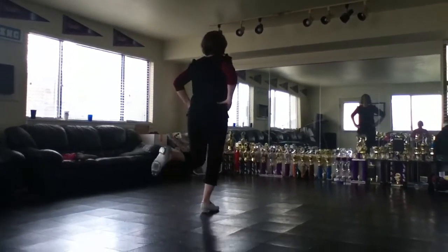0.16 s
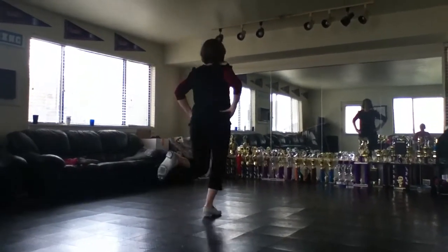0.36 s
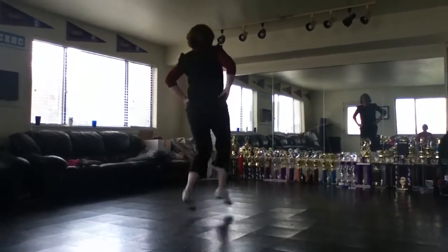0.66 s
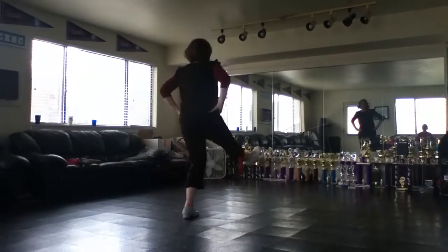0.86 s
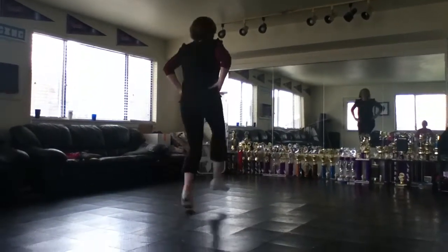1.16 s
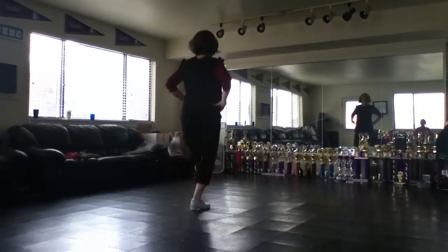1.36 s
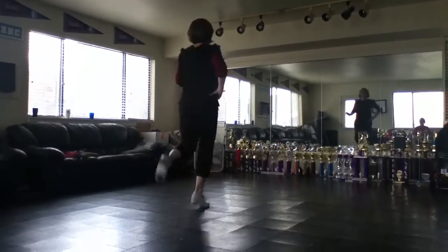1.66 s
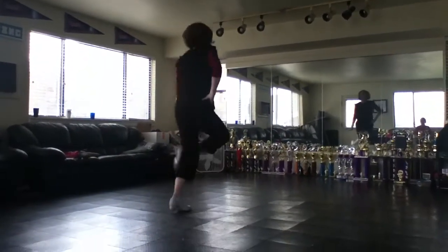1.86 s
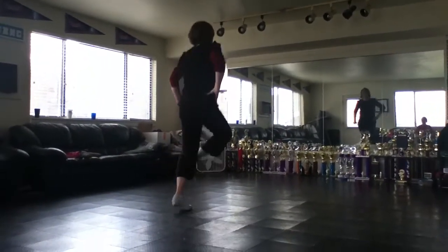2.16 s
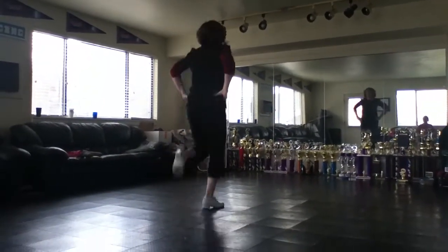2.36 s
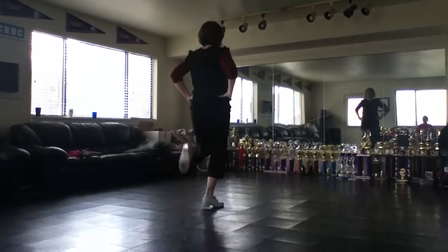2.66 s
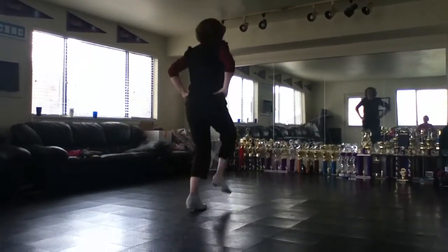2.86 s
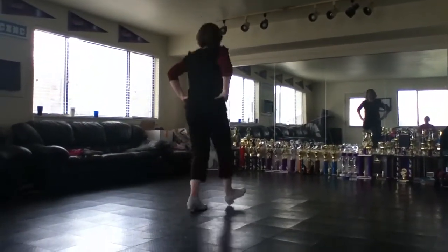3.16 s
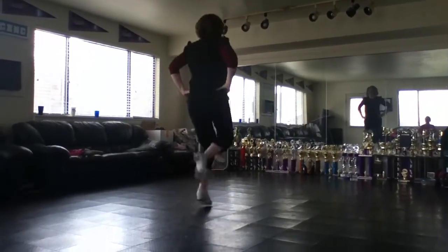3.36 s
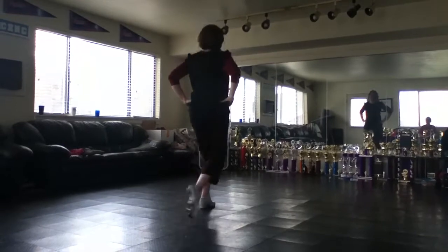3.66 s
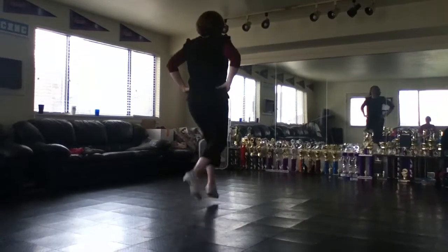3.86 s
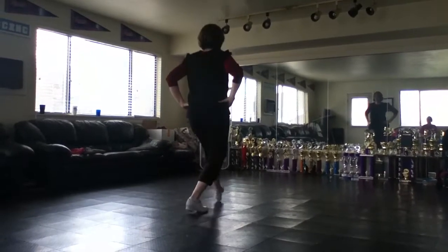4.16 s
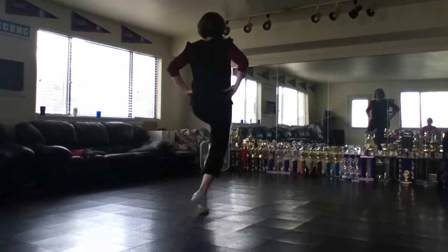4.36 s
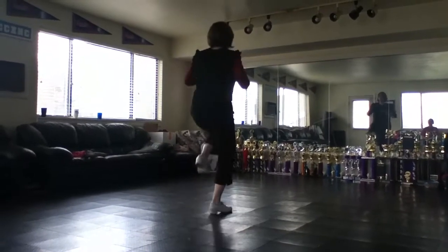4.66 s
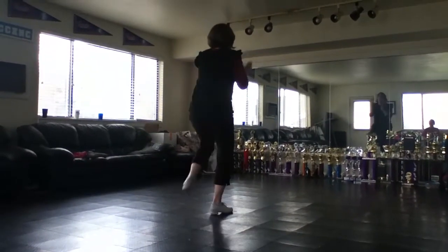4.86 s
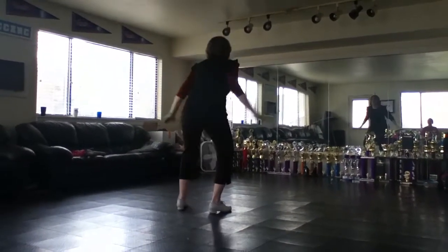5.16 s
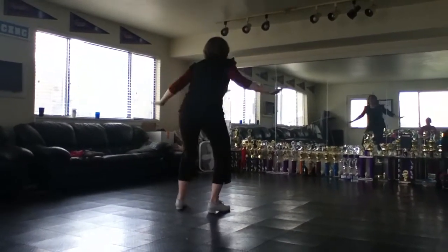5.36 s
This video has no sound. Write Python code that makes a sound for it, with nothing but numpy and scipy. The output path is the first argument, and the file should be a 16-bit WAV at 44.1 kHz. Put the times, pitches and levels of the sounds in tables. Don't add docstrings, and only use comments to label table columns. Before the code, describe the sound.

A lone dancer's steel-tapped shoes strike tile in sharp, thudding steps with metallic rattles between, ringing through a reverberant mirrored studio.

```python
import sys
import numpy as np
from scipy import signal
from scipy.fft import rfft, irfft
from scipy.io import wavfile

SR = 44100
rng = np.random.default_rng(int(sys.argv[2]) if len(sys.argv) > 2 else 0)


def dump(signal):
    limited = np.clip(np.atleast_2d(signal).T, -1, 1)
    pcm = np.round(limited * 32767).astype(np.int16)
    wavfile.write(sys.argv[1], SR, pcm)


def invert_db(x):
    u = np.asarray(x, float) / 20
    return 10 ** u


N = 243431
LEAD = 8192

# pitch in Hz, level in dB, time to fade by 60 dB in seconds.
FLOOR_MODES = [(171.4, -15, 0.077), (200.4, -9, 0.041), (254.4, -3, 0.034), (317, -10.5, 0.055)]
# pitch in Hz, level in dB, time to fade by 60 dB in seconds.
SOLE_MODES = [(561, -2, 0.05), (655.2, 0, 0.039), (740, 4, 0.051), (888, 2.5, 0.092), (983, 8.5, 0.033),
              (1052, 6.5, 0.039), (1290, 13, 0.034)]
# pitch in Hz, level in dB, time to fade by 60 dB in seconds.
TILE_MODES = [(1290, -5, 0.0025), (1890, 2, 0.0031), (2360, -1, 0.0027), (2850, -1.5, 0.0036),
              (3500, 3.5, 0.0029), (4500, 7.5, 0.0018)]
# pitch in Hz, level in dB, time to fade by 60 dB in seconds.
SLAB_MODES = [(38.3, -10, 0.6), (47.8, -17, 0.7), (69.1, -6.5, 0.6), (95.9, 1, 0.35)]
# pitch in Hz, level in dB, time to fade by 60 dB in seconds.
FIRST_PLATE = [(4020, -47, 0.058), (5020, -3.5, 0.04), (5150, -25, 0.03), (5830, 3, 0.04),
               (7440, -14.5, 0.018), (8100, -12.5, 0.019), (8310, -5.5, 0.085), (11000, -11.5, 0.09),
               (12700, -23, 0.073), (13300, -13, 0.038), (13800, -27, 0.018)]
# pitch in Hz, level in dB, time to fade by 60 dB in seconds.
SECOND_PLATE = [(4110, 3.5, 0.019), (4700, 2.5, 0.03), (5220, -1, 0.12), (6480, -3.5, .03),
                (7500, 0.5, 0.093), (9050, -1, 0.062), (10400, -26, 0.04), (11900, -8, .04),
                (13500, -34, .04), (14800, -19, .03)]

# start in seconds, steel crack in dB,
# heel thud in dB, sole knock in dB, pitch the sole favours in Hz.
STOMPS = [(-.09, -5.5, -13.5, -38, 544), (0.9686, -8, -16, -5.5, 1020), (1.515, -7, -22, -5.5, 698),
          (2.0674, -10, -18.5, -6, 830), (2.5834, -6, -14, -6.5, 740), (3.0972, -6.5, -14, -4, 573),
          (3.3775, -7.5, -15.5, -7.5, 816), (3.6582, -10.5, -19, -13.5, 930), (3.906, -5.5, -14, -4.5, 527),
          (4.1958, -5.5, -18, -8, 900), (4.7323, -8, -8, -38, 970), (5.2545, -3.5, -7, -10, 1210)]
# start in seconds, steel crack in dB, sole knock in dB.
BRUSHES = [
    (0.872, -30.5, -26.5),
    (1.411, -38, -45),
    (1.4342, -33.5, -50),
    (1.997, -32, -32),
    (2.4886, -38, -36),
    (3.047, -36, -40),
    (1.545, -26, -25),
    (5.288, -12.5, -14),
]
# start in seconds, steel crack in dB, heel thud in dB.
DRAG = [(4.643, -44, -39), (4.6631, -41, -40), (4.6937, -28.5, -39), (4.7123, -36, -24.5)]
BRUSH_THUD_DB, DRAG_KNOCK_DB = -10, -3
LIGHT_SOLE_HZ = 900

# start in seconds, level in dB,
# share of the second shoe from 0 to 1, loudest partial in Hz.
PRESSED = [(0.9733, -9.5, 0.17, 5150), (1.5248, -17.5, 0.66, 3500), (1.5991, -18.5, 0.5, 4500),
           (2.075, -14.5, 0.45, 5700), (2.584, -8, 0.38, 4540), (3.1034, -10.5, 0.67, 3860),
           (3.397, -13.5, 0.52, 6140), (3.9148, -15, 0.85, 4000), (4.2034, -12, 0.62, 6500),
           (4.666, -31.5, 0.2, 6000), (4.7507, -8, 0.6, 3330), (5.2847, -10, 0.76, 4120)]
# start in seconds, level in dB,
# share of the second shoe from 0 to 1, loudest partial in Hz.
REBOUNDING = [(0.787, -33.5, 0.27, 5540), (1.0276, -13.5, 0.13, 5900), (1.412, -29, 0.4, 5550),
              (1.433, -27.5, 0.96, 4500), (2.1084, -12.5, 0.08, 4800), (2.487, -26.5, 0.58, 4850),
              (3.1299, -11.5, 0.07, 4730), (3.704, -12, 0.39, 5930), (4.2309, -11.5, 0.23, 4170)]
# start in seconds, level in dB,
# share of the second shoe from 0 to 1, loudest partial in Hz.
SWINGING = [(0.697, -38.5, 0.3, 5830), (0.7315, -36, 0, 5700), (0.8998, -19.5, 0.32, 5440),
            (1.808, -36, 0.87, 9050), (2.824, -31.5, 0.72, 9050), (2.919, -33, 0.3, 4860),
            (3.078, -34.5, 0.6, 4700), (3.624, -28, 0.59, 7500)]
# freedom to ring from 0 to 1, rattle length in milliseconds.
GRIP = [(.2, 17), (.45, 34), (.9, 12)]

# pitch in Hz, time to fade by 60 dB in seconds,
# extra strength of the first echoes as a share.
ROOM_T60 = [(100, 0.38, 2.5), (252, 0.64, 1.46), (740, 0.73, 3.8), (1550, 0.84, 0.34), (5200, 0.87, 0.041),
            (8400, 0.69, 0.48), (10600, 0.48, 0.018), (15000, 0.42, 0.028)]
# pitch in Hz, level in dB per Hz.
HUSH = [(12, -63), (20, -12), (163, -6), (320, -3.5), (400, -13.5), (1060, -13), (7950, -26.5),
        (16000, -35)]
HUSH_DB = -61.5


def rings(modes, chance, detune, scatter_db, size=8192):
    hz, db, t60 = np.transpose(modes)[:, :, None]
    t, n = np.arange(size) / SR, len(modes)
    hz = hz * (1 + detune * chance[:n, None])
    strength = invert_db(db + scatter_db * chance[n:2 * n, None])
    fade = np.exp(-np.log(1000) * t / t60)
    return np.sum(strength * np.sin(2 * np.pi * hz * t) * fade, axis=0)


def favour(modes, hz, db_per_octave, ring):
    out = np.array(modes, float)
    octaves_off = np.abs(np.log2(out[:, 0] / hz))
    out[:, 1] -= db_per_octave * np.minimum(octaves_off, .6)
    out[:, 2] *= ring
    return out


def click(size, lo_hz, hi_hz):
    band = signal.butter(2, [lo_hz, hi_hz], "band", fs=SR, output="sos")
    y = signal.sosfilt(band, signal.unit_impulse(size))
    return y / np.abs(y).max()


def low_cut(x, order, hz):
    return signal.sosfilt(signal.butter(order, hz, "high", fs=SR, output="sos"), x)


def add(dry, s, sound, place):
    i = int(s * SR) + LEAD
    n = min(len(sound), dry.shape[1] - i)
    paths = np.append(1, place / np.linalg.norm(place))[:len(dry), None]
    dry[:, i:i + n] += paths * sound[:n]


def thud_and_knock(thud_db, knock_db, sole_hz, c):
    ring = np.clip(1 + (knock_db + 15) / 40, .3, .42)
    sole = low_cut(rings(favour(SOLE_MODES, sole_hz, 14, ring), c[11:], .02, 1.5), 3, 520)
    floor = rings(FLOOR_MODES, c[3:], 0.038, 2.3)
    body = invert_db(thud_db - 8) * floor + invert_db(knock_db - 14.5) * sole
    t = np.arange(len(body)) / SR
    body *= 1 - np.exp(-t / 0.003)
    gap = int(.00233 * SR)
    body[gap:] -= 0.52 * body[:-gap].copy()
    return body


def steel_crack(crack_db, sole_hz, edge, c):
    modes = favour(TILE_MODES, 2.34 * sole_hz, 6, ring=1.57)
    tile = low_cut(rings(modes, c, .05, 2.), 3, 520)
    return invert_db(crack_db - 13.0) * tile + invert_db(crack_db - 12.5) * edge


def slab_boom(thud_db, c):
    boom = rings(SLAB_MODES, c, .1, 3., size=16384)
    t = np.arange(len(boom)) / SR
    boom *= (1 - np.exp(-t / 0.057)) * np.cos(np.pi * t / t[-1] / 2)
    return invert_db(0.66 * thud_db - 21.5) * boom


def steps():
    rows = list(STOMPS)
    for s, crack_db, knock_db in BRUSHES:
        rows.append((s, crack_db, knock_db + BRUSH_THUD_DB, knock_db, LIGHT_SOLE_HZ))
    for s, crack_db, thud_db in DRAG:
        rows.append((s, crack_db, thud_db, thud_db + DRAG_KNOCK_DB, LIGHT_SOLE_HZ))
    dry, slab = np.zeros((4, N + LEAD)), np.zeros((1, N + LEAD))
    edge = click(8192, 7660, 10640)
    bounces = [(0, 0), (.0016, -3), (.005, -2)]
    chances = rng.standard_normal((len(rows), 80))
    for (s, crack_db, thud_db, knock_db, sole_hz), c in zip(rows, chances):
        body = thud_and_knock(thud_db, knock_db, sole_hz, c)
        add(dry, s, 0.75 * body, c[:3])
        add(dry[:1], s + .009, 1.76 * body, np.ones(1))
        for k, (late_s, bounce_db) in enumerate(bounces):
            steel = steel_crack(crack_db, sole_hz, edge, c[36 + 12 * k:])
            bounce_s = s + late_s * (1 + .4 * abs(c[23 + k]))
            add(dry, bounce_s, invert_db(bounce_db) * steel, np.eye(3)[k])
        add(slab, s, slab_boom(thud_db, c[26:]), np.ones(1))
    return dry, slab[0]


def room(size=65536):
    t = np.arange(size) / SR
    f = np.maximum(np.fft.rfftfreq(size, 1 / SR), 1)
    dense = np.clip((t / 0.035) ** 2, .004, 1)
    hits = rng.random((3, size)) < dense
    echoes = rng.standard_normal((3, size)) * hits / np.sqrt(dense)
    spectrum = rfft(echoes * (1 - np.exp(-t / 0.0015)))
    hz, t60, early = np.transpose(ROOM_T60)
    tail = 0
    for centre in 30 * 2 ** np.arange(0, 10, .5):
        share = np.clip(1 - 2 * np.abs(np.log2(f / centre)), 0, 1)
        fade_s = np.interp(np.log(centre), np.log(hz), t60)
        first_echoes = np.interp(np.log(centre), np.log(hz), early)
        fade = np.exp(-np.log(1000) * t / fade_s)
        fade *= 1 + first_echoes * np.exp(-t / 0.14)
        tail = tail + irfft(spectrum * share, size) * fade
    return invert_db(-23) * tail * (t > .002)


def hush():
    hz, db = np.transpose(HUSH)
    f = np.maximum(np.fft.rfftfreq(N, 1 / SR), 1)
    colour = invert_db(np.interp(np.log(f), np.log(hz), db))
    x = irfft(rfft(rng.standard_normal(N)) * colour, N)
    return x * invert_db(HUSH_DB + 2) / x.std()


def jingles():
    rows = []
    for table, grip in zip([PRESSED, REBOUNDING, SWINGING], GRIP):
        rows += [(*row, *grip) for row in table]
    dry = np.zeros((4, N + LEAD))
    tick = click(3072, 5500, 6600)
    chances = rng.standard_normal((len(rows), 5, 50))
    for (s, db, share, hz, free, rattle_ms), chance in zip(rows, chances):
        detune = .008 / free
        for k, c in enumerate(chance):
            first = rings(favour(FIRST_PLATE, hz, 10.4, free), c[4:], detune, 1.25, size=3072)
            second = rings(favour(SECOND_PLATE, hz, 20, free), c[26:], detune, 3., size=3072)
            steel = ((1 - share) * first + share * second) / np.sqrt(free)
            steel += 1.9 * (1 - free) * tick
            tick_s = s + k * (.5 + abs(c[3])) * rattle_ms / 5000
            tick_db = db - 12 - 5.5 * abs(k - 0.65)
            add(dry, tick_s, invert_db(tick_db) * steel, c[:3])
    return dry


def scene():
    shoes, slab = steps()
    dry = shoes + jingles()
    echoes = signal.fftconvolve(dry[1:], room(), axes=1).sum(axis=0)[:N + LEAD]
    wet = low_cut(2.31 * dry[0] + echoes, 4, 150)
    return (wet[LEAD:] + slab[LEAD:] + hush())[None]


def roll_off(x):
    return signal.sosfilt(signal.butter(12, 16510, fs=SR, output="sos"), x)


def record(dry):
    ceiling = .68
    rounded = ceiling * np.tanh(dry / ceiling)
    top_cut = signal.ellip(8, .2, 40, 16100, fs=SR, output="sos")
    mix = signal.sosfilt(top_cut, rounded)
    return roll_off(mix)


dry = scene()
out = record(dry)
dump(out)
```